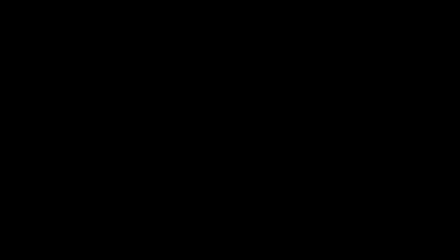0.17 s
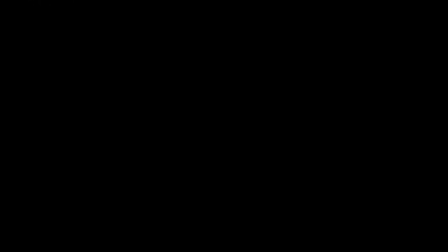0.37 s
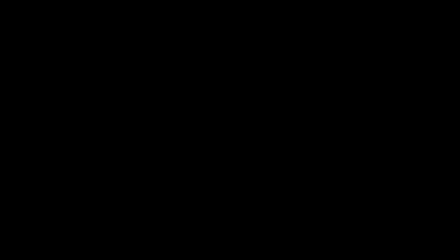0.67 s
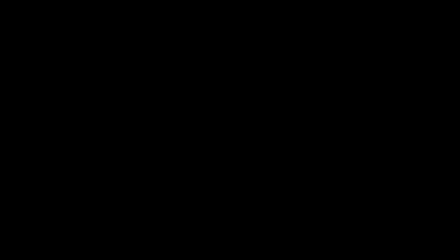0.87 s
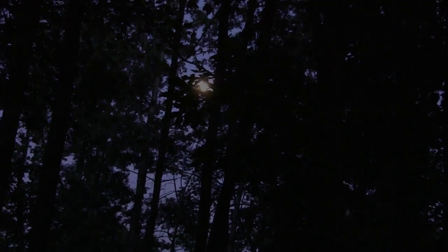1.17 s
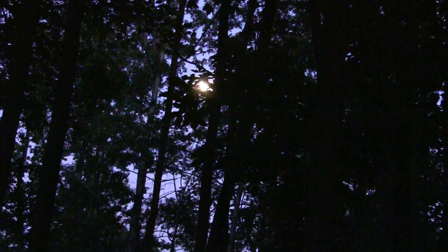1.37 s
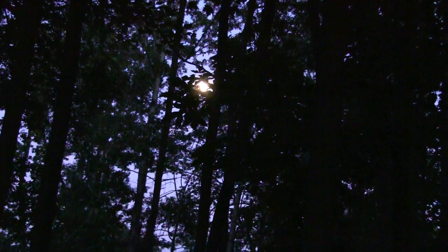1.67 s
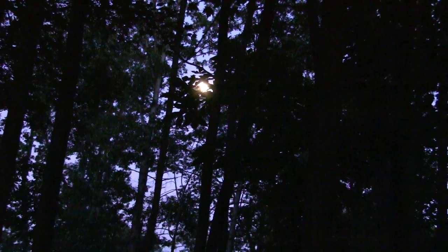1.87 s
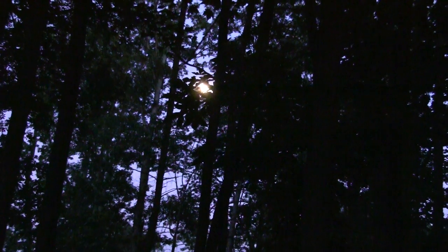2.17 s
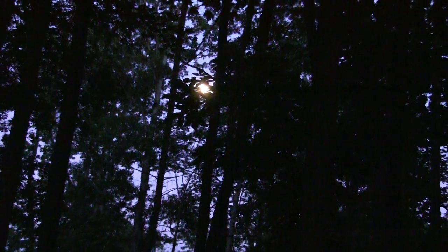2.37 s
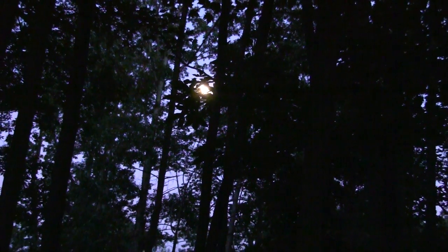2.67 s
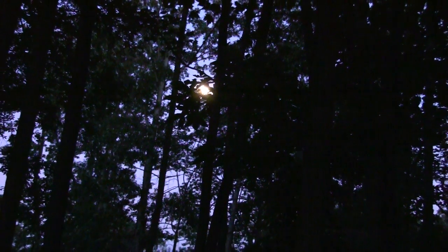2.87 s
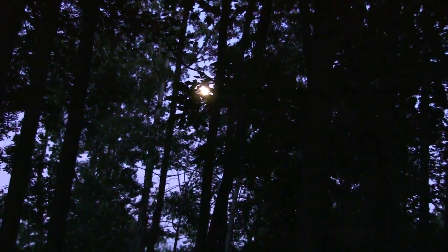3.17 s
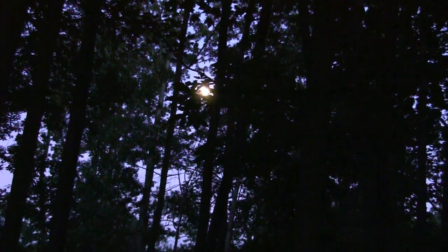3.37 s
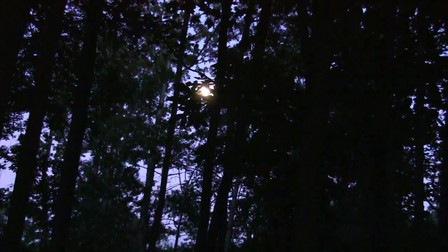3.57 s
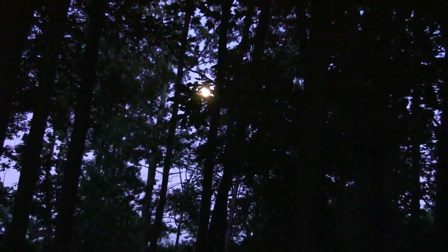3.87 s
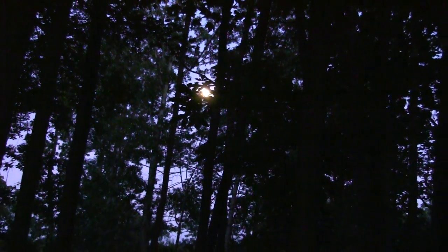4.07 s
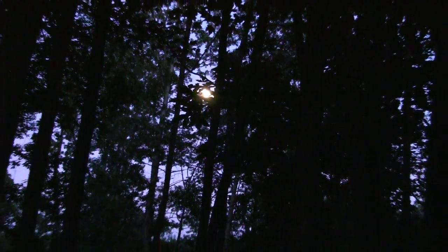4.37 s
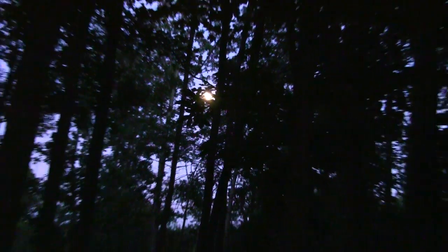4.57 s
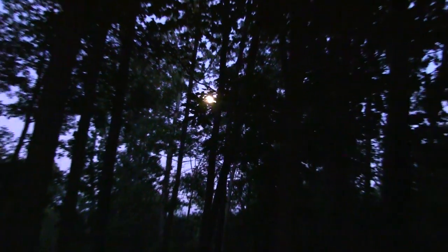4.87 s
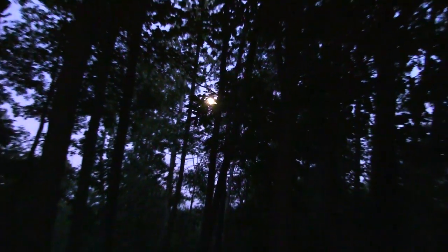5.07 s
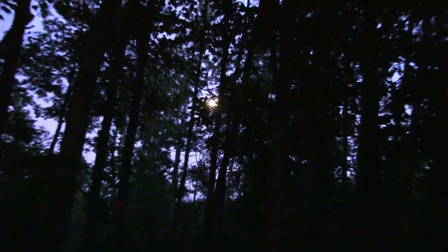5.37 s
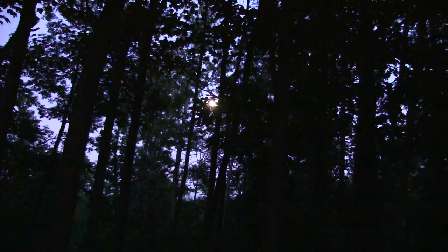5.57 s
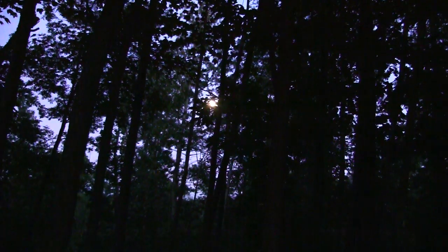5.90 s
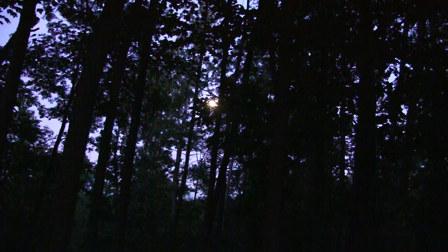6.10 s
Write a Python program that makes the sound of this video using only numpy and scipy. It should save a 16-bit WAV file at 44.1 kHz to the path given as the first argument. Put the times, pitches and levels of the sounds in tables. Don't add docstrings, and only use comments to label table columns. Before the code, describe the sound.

Sound fades up from silence into a continuous cricket chorus in a forest at dusk. Low, mid and high trills overlap, near and far, over faint low air. A close katydid buzzes short four-syllable phrases early on, a far hiss swells, and a rasping insect croaks in groups. Close stereo microphones on a hand-held camera pick up soft rumbles and dull knocks, the hardest past the middle.

```python
import sys
import numpy as np
from scipy import signal
from scipy.fft import rfft, irfft, next_fast_len
from scipy.io import wavfile

SR = 44100
rng = np.random.default_rng(int(sys.argv[2]) if len(sys.argv) > 2 else 0)


def ratio_of_db(decibels):
    return 10 ** (np.asarray(decibels, float) / 20)


def store_pcm(level_fs):
    pcm = np.round(np.clip(level_fs, -1, 1) * 32767).astype(np.int16)
    wavfile.write(sys.argv[1], SR, np.atleast_2d(pcm).T)


N = 275184
TIME = np.arange(N) / SR

# (wing tone [Hz], spread between singers [Hz], pulse rate [1/s],
# sounding share of the period [0-1], drop within a pulse [Hz], lead singer [dB])
LOW_CRICKET = (2325, 35, 49, .65, 100, 4)
MID_CRICKET = (2660, 70, 42, .55, 150, 2.7)
HIGH_CRICKET = (3120, 50, 35, .45, 100, 6.3)
GROUND_CRICKET = (5650, 120, 26, 0.46, 200, -1)
CHIRPER = (4700, 130, 43, .7, 110, 4)
# (level against the near singers [dB], wings as (centre [Hz], width [Hz], level [dB]))
FAR_CROWDS = [
    (3.2, [(2310, 218, 1), (2165, 205, -9)]),
    (2.7, [(2672, 295, -0.5), (2520, 210, -4)]),
    (1, [(3089, 334, 3), (2980, 270, -7)]),
    (5.3, [(5386, 290, -0.5), (5660, 370, 0.5), (5100, 340, -13), (5900, 290, -12), (6220, 730, -18), (6330, 62, -24)]),
    (3.9, [(4354, 340, -2.5), (4740, 460, -5), (4700, 100, -0.5)]),
]
STEADY_DB = (-41, -43.5, -49.5)
# (time [s], level [dB])
GROUND_SWELLS = [(1.15, -43), (1.3, -48.5), (1.49, -44.5), (1.7, -47.5), (1.85, -43), (2.04, -48),
                 (2.2, -43.5), (2.55, -46), (3.7, -44.5), (3.8, -48), (3.97, -43.5), (4.19, -48.5),
                 (4.3, -42.5), (4.46, -46.5), (5.2, -44.5), (5.38, -47), (5.55, -45), (6.24, -45)]
# (start [s], length [s], level [dB])
CHIRPER_BOUTS = [
    (1.15, .1, -54),
    (1.55, 0.75, -53.5),
    (3.02, .4, -53),
    (4.22, .75, -53),
    (5.1, 0.14, -55.5),
    (5.45, .3, -55.5),
    (5.9, .4, -56),
]
CHIRPER_REST_DB, CHIRPER_EDGE_S = -58.5, 0.042

# (frequency [Hz], density [dB per Hz])
AIR_LOW = [(12, -43), (20, -9), (49, -11.5), (123, 1), (209, -4.5), (318, -6), (355, -5), (433, -7.5),
           (484, -8), (748, -9.5), (948, -9.5), (1550, -16), (2020, -20), (3410, -120)]
# (frequency [Hz], density [dB per Hz])
AIR_HIGH = [(1500, -29), (2200, 0), (3600, -4.5), (6500, 1), (7200, -11), (8600, -10), (9500, -3.5),
            (12000, -5.5), (13600, -4), (14700, -5.5), (15300, -6.5), (16000, -8)]
# (time [s], level [dB])
BREEZE = [(1.25, -66.5), (1.39, -67.5), (2.25, -68), (2.96, -69.5), (3.64, -72), (3.81, -69.5),
          (5.34, -69.5), (5.91, -71), (6.24, -72)]

# (start [s], syllable spacing [s], peak [dB], brightness [dB], lean to the left [-1 to 1])
KATYDID = [
    (.44, 0.079, -52, -6, .1),
    (1.53, .09, -52, -14, .01),
    (2.32, .094, -49, -6.5, .08),
]
# (centre [Hz], width [Hz], level [dB])
KATYDID_WING = [(6600, 880, -7), (7260, 400, -1), (7900, 550, 1), (7930, 120, -1), (7640, 60, 0),
                (8600, 1400, -4.5)]
# (centre [Hz], width [Hz], level [dB])
KATYDID_TOP = [(9900, 770, 1.5), (10700, 1400, -1), (11600, 1500, -3)]
WEAK_BEAT_DB, SYLLABLE_S = 1.2, 0.033

# (middle [s], half length [s], peak [dB])
SWELLS = [(.75, 0.27, -56), (1.45, 0.35, -61), (2.45, .35, -59.5), (3.3, .25, -64.5), (3.7, 0.37, -59),
          (4.502, 0.24, -68), (5.3, 0.33, -65.5), (5.804, 0.26, -60.5)]
# (centre [Hz], width [Hz], level [dB])
SWELL_BODY = [(6900, 1400, 2.5), (7770, 3100, 3), (9260, 890, 3)]
SWELL_REST_DB = -75

# (middle [s], peak [dB])
RASP = [(0.69, -58), (0.88, -56), (1.24, -56.5), (1.43, -54.5), (1.67, -65), (1.87, -60.5), (2.07, -59.5),
        (2.61, -60.5), (2.8, -60.5), (3.11, -59), (3.28, -59.5), (3.37, -63), (3.59, -59.5), (3.81, -63.5),
        (4.3, -58.0), (4.49, -57), (4.73, -56.0), (4.93, -57.5), (5.12, -60.5), (5.57, -60), (5.77, -58.5),
        (5.99, -59.5), (6.15, -64.5)]
# (centre [Hz], width [Hz], level [dB])
RASP_BODY = [(1830, 440, -2), (3550, 390, -4.5), (4100, 970, -1), (4560, 1650, 1)]
CROAK_S, RASP_REST_DB = 0.071, -72

# (start [s], length [s], rumble [dB])
HANDLING = [
    (.66, 0.29, -57),
    (1.1, .7, -61.5),
    (4.414, 0.51, -58.5),
    (4.95, 0.75, -61.5),
]
# (start [s], length [s], first pitch [Hz], level [dB])
SLIPS = [(1.02, .06, 148, -55), (1.262, 0.1, 128.6, -52), (1.5, .06, 160, -58), (4.57, 0.14, 153, -48.5),
         (4.74, .14, 130, -55.5), (4.96, 0.13, 152, -53.5), (5.06, .14, 103, -58.5), (5.14, .05, 153, -55),
         (5.26, 0.048, 126.6, -55), (5.53, .09, 120, -54)]
# (time [s], peak [dB], ring [Hz])
KNOCKS = [
    (1.035, -42, 139.4),
    (1.248, -46, 110),
    (4.422, -39, 96.9),
]
SAG_HZ_PER_S, SLIP_EDGE_S, HOLD_EDGE_S = 112, .025, .05
SNAP_DB, SNAP_S = -8, .03

# (frequency [Hz], decay by 60 dB [s])
TREES = [(100, 0.27), (2000, 0.35), (6000, 0.29), (15000, .12)]
# (frequency [Hz], side minus middle [dB])
WIDTH = [(60, -8), (200, -6), (350, -8), (900, -2), (1400, -5), (2000, -9), (2800, -6), (4000, -15.5),
         (5600, -14.5), (6300, -25), (7000, -17), (8000, -17), (10000, -19), (11500, -24), (15000, -18)]
# (frequency [Hz], left minus right [dB])
LEAN = [(60, 1), (110, -2), (200, -2.5), (380, -0.5), (700, -3), (1290, -2.5), (2380, 0.5), (4400, -0.5),
        (8120, 1), (15000, 0)]
# (start [s], end [s], power [1])
FADE = (0.49, 1.253, 1.71)


def unit(x):
    return x / np.sqrt(np.mean(x ** 2) + 1e-20)


def along(points, hz):
    f, v = np.transpose(points)
    return np.interp(np.log(hz + 1), np.log(f + 1), v)


def curve(rows):
    return np.interp(TIME, *np.transpose(rows))


def wobble(rate):
    count = int(N * rate / SR) + 2
    return np.interp(TIME * rate, np.arange(count), rng.standard_normal(count))


def held(start, length, edge):
    rise = TIME - start + edge
    fall = start + length + edge - TIME
    return np.clip(np.minimum(rise, fall) / (2 * edge), 0, 1)


def bells(middle, half, db):
    return ratio_of_db(db) * np.exp(-((TIME - middle) / half) ** 2)


def filtered(x, response):
    m = next_fast_len(N + SR // 2)
    return irfft(rfft(x, m) * response(np.fft.rfftfreq(m, 1 / SR)), m)[..., :N]


def resonant(noise, modes):
    def response(f):
        return np.sqrt(sum(ratio_of_db(db) ** 2 / (1 + ((f - c) / w * 1.58) ** 2) ** 3 for c, w, db in modes))
    return unit(filtered(noise, response))


def scrape(rate, depth):
    teeth = np.cumsum(rate * (1 + .05 * wobble(12))) / SR
    return rng.standard_normal(N) * (1 - depth + depth * np.exp(-3 * (teeth % 1)))


def chorus(kind, far, count=4):
    hz, spread_hz, rate, share, drop_hz, lead_db = kind
    song = np.zeros(N)
    for k, (pitch, pace, start) in enumerate(rng.standard_normal((count, 3))):
        lead = k == 0
        beat = 9 + start + TIME * rate * (1 + .08 * pace * (not lead)) + .05 * wobble(3)
        stroke = np.minimum(beat % 1 / np.clip(share, .1, 1), 1)
        tone = hz + spread_hz * pitch * (not lead) + drop_hz * (.5 - stroke)
        entry = rng.uniform(0, 2 * np.pi, 500)[beat.astype(int) % 500]
        strength = ratio_of_db(lead_db * lead + 0.84 * wobble(9)) * np.sin(np.pi * stroke) ** 2
        song += strength * np.sin(2 * np.pi * np.cumsum(tone) / SR + entry)
    far_db, far_wings = far
    wash = resonant(rng.standard_normal(N), far_wings)
    return unit(unit(song) + ratio_of_db(far_db) * wash)


def crickets():
    kinds = LOW_CRICKET, MID_CRICKET, HIGH_CRICKET, GROUND_CRICKET, CHIRPER
    rest = ratio_of_db(CHIRPER_REST_DB)
    bouts = np.max([rest + (ratio_of_db(db) - rest) * held(s, length, CHIRPER_EDGE_S)
                    for s, length, db in CHIRPER_BOUTS], axis=0)
    gains = [*ratio_of_db(STEADY_DB), ratio_of_db(curve(GROUND_SWELLS) - 0.1), bouts]
    return sum(ratio_of_db(0.77) * gain * chorus(kind, far) for kind, far, gain in zip(kinds, FAR_CROWDS, gains))


def air():
    low = unit(filtered(rng.standard_normal(N), lambda f: ratio_of_db(along(AIR_LOW, f))))
    high = unit(filtered(rng.standard_normal(N), lambda f: ratio_of_db(along(AIR_HIGH, f))))
    swell = far_hiss()
    breeze = curve(BREEZE)
    low_db = -57.0 + 0.31 * (breeze - breeze.mean()) + 0.79 * wobble(3.09)
    drone = resonant(rng.standard_normal(N), [(356, 8.3, 0)])
    return ratio_of_db(low_db) * low + ratio_of_db(-54.5) * high + swell + ratio_of_db(-74.0) * drone


def katydids():
    effort = np.zeros((2, 2, N))
    for s, step, db, bright_db, lean in KATYDID:
        levels = np.outer([1, lean], ratio_of_db([db + 7, db + 8.5 + bright_db]))[..., None]
        for k in range(4):
            age = np.maximum(TIME - s - k * step, 0) / SYLLABLE_S
            effort += levels * ratio_of_db(-WEAK_BEAT_DB * (k % 2)) * age * np.exp(-age)
    teeth = scrape(rate=220, depth=0.27)
    return effort[:, 0] * resonant(teeth, KATYDID_WING) + effort[:, 1] * resonant(teeth, KATYDID_TOP)


def far_hiss():
    effort = ratio_of_db(SWELL_REST_DB) + sum(bells(*row) for row in SWELLS)
    return effort * ratio_of_db(1.0 * wobble(11)) * resonant(rng.standard_normal(N), SWELL_BODY)


def rasp():
    effort = ratio_of_db(RASP_REST_DB) + sum(bells(s, CROAK_S, db) for s, db in RASP)
    return ratio_of_db(4.0) * effort * resonant(scrape(rate=212, depth=0.66), RASP_BODY)


def camera():
    rumble = resonant(rng.standard_normal(N), [(121, 84, -1.5), (213, 52, -4.5)])
    body = rumble * sum(ratio_of_db(db) * held(s, length, HOLD_EDGE_S) for s, length, db in HANDLING)
    tremor = 1.07 + 0.34 * wobble(16)
    for s, length, hz, db in SLIPS:
        age = TIME - s
        hum = np.sin(2 * np.pi * (hz - SAG_HZ_PER_S * age / 2) * age)
        body += ratio_of_db(db) * held(s, length, SLIP_EDGE_S) * tremor * hum
    for s, db, hz in KNOCKS:
        age = np.maximum(TIME - s, 0)
        body += ratio_of_db(db - 2 - 60 * age / 0.18) * np.sin(2 * np.pi * hz * age)
        body += ratio_of_db(db + SNAP_DB - 60 * age / SNAP_S) * np.sin(2 * np.pi * 2.6 * hz * age)
    return body


def trees(x):
    hz, t, z = signal.stft(rng.standard_normal((2, SR // 2)), SR, nperseg=256)
    z = z / np.abs(z) * ratio_of_db(-60 * t / along(TREES, hz)[:, None])
    z = z / np.linalg.norm(z, axis=-1, keepdims=True)
    tail = signal.istft(z, SR, nperseg=256)[1]
    return signal.fftconvolve(x[None], tail / np.linalg.norm(tail[0]), axes=1)[:, :N]


def scene():
    callers = crickets() + rasp()
    buzz, buzz_side = katydids()
    insects = callers + buzz
    wet, late = trees(insects)
    mid = ratio_of_db(-0.3) * insects + ratio_of_db(-11) * wet + air()
    far_side = np.roll(late, SR // 30) + air()
    side = filtered(far_side, lambda f: ratio_of_db(along(WIDTH, f))) + buzz_side
    pair = np.array([mid + side, mid - side]) + camera() * ratio_of_db([[-1.5], [1.2]])
    return filtered(pair, lambda f: ratio_of_db(np.outer([.5, -.5], along(LEAN, f))))


def low_pass(x):
    return signal.sosfilt(signal.butter(12, 15750, fs=SR, output="sos"), x)


def record(dry):
    start, end, power = FADE
    fade = np.clip((TIME - start) / (end - start), 0, 1) ** power
    return low_pass(dry * fade)


dry = scene()
out = record(dry)
store_pcm(out)
```